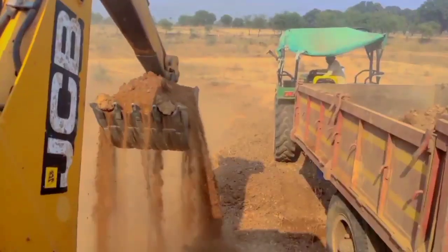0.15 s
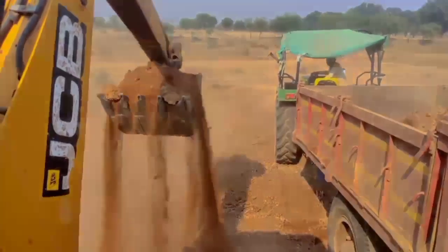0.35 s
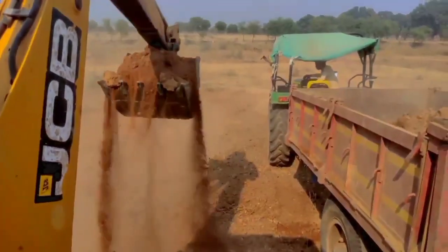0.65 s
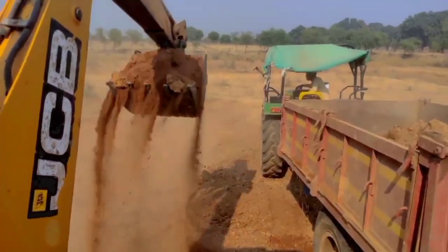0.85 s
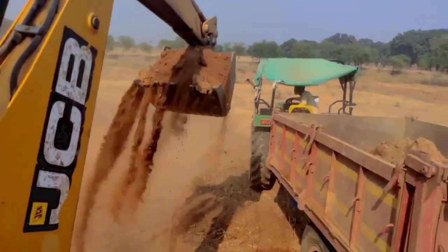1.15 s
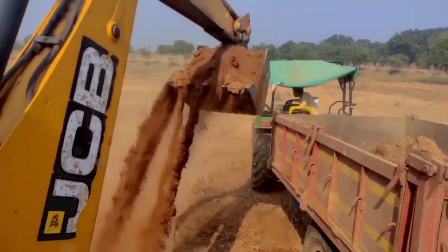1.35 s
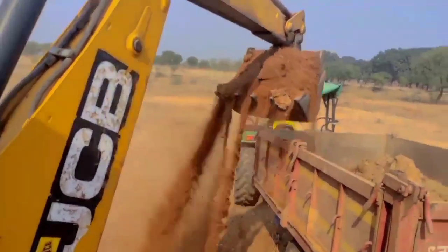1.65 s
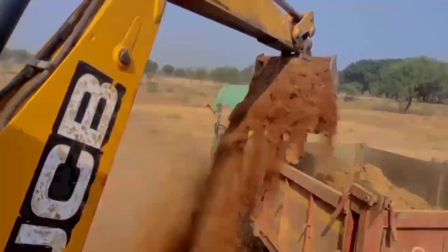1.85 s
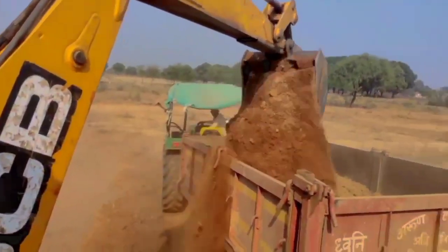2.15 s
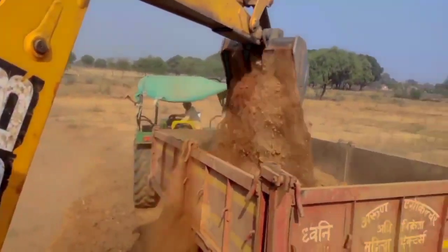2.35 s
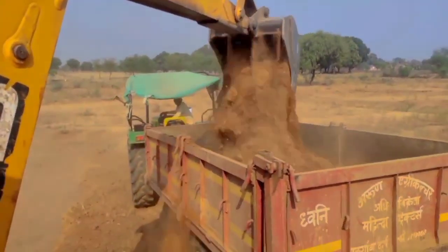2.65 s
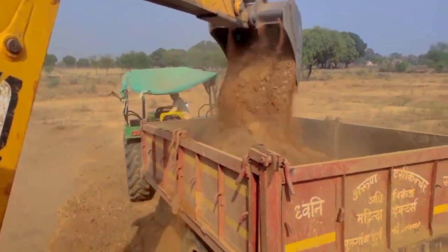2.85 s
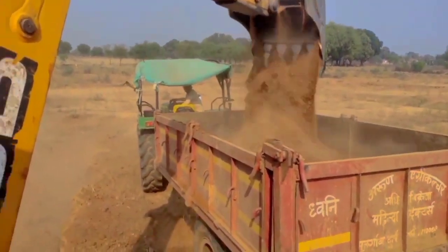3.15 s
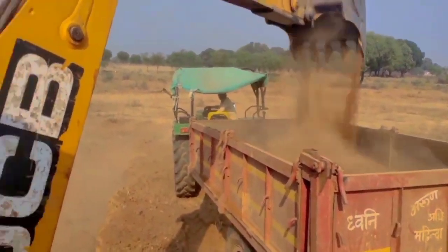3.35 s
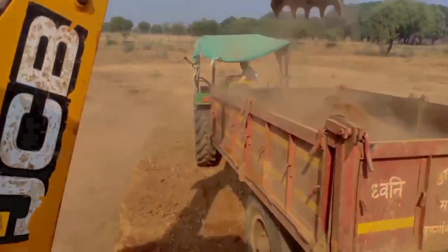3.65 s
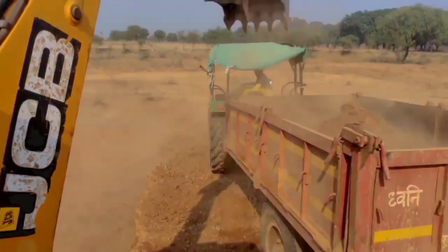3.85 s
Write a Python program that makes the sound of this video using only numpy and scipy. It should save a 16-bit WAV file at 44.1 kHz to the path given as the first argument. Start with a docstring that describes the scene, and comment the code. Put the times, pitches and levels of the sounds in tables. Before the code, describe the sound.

Soil and clods drum and thud into a steel trailer in an open field, heard from a backhoe's cab. The diesel clatters throughout; arm joints knock first, then dry pivots groan and squeal as the earth pours and hisses.

```python
"""An open field, from the cab of a backhoe that swings a bucket of soil over a steel trailer and tips it.
The dry bucket pivots stick and slip, groaning and squealing in rising steps; loose arm joints knock.
Clods drum and thud into the trailer, soil scrapes the bucket plate, fine earth hisses and grit ticks.
Underneath, the diesel's firings drive an exhaust hum, a panel rumble and a steady clatter."""
import sys
import numpy as np
from scipy import signal
from scipy.fft import rfft, irfft
from scipy.io import wavfile
from scipy.ndimage import uniform_filter1d

SR = 44100
rng = np.random.default_rng(int(sys.argv[2]) if len(sys.argv) > 2 else 0)


def wav_record(signal):
    """Record a signal, one row per channel, as 16-bit PCM in the file named by sys.argv[1]."""
    frames = np.transpose(np.atleast_2d(signal))
    bounded = np.clip(frames, -1, 1)
    # unit amplitude maps onto the largest positive 16-bit level
    quanta = np.round(bounded * 32767).astype(np.int16)
    wavfile.write(sys.argv[1], SR, quanta)


N = 176400
T = np.arange(N) / SR
HARD_ATTACK_S, SOFT_ATTACK_S = 0.0018, 0.012
CLODS_PER_S, CLOD_SPREAD_DB = 1800, 1


def from_db(db):
    """Decibels to gain."""
    return 10 ** (np.asarray(db) / 20)


def rms_one(x):
    """Scale to an rms of one."""
    return x / np.sqrt(np.mean(x ** 2) + 1e-20)


def automation(points):
    """Straight lines through (time_s, value) points, at every sample."""
    return np.interp(T, *np.transpose(points))


def drift(rate_hz):
    """Smooth random modulation, rms one, rolling off above rate_hz."""
    hop, settle = 40, 2000
    pole = np.exp(-2 * np.pi * rate_hz * hop / SR)
    noise = rng.standard_normal(N // hop + settle + 2)
    slow = signal.lfilter([1], [1, -2 * pole, pole * pole], noise)[settle:]
    return np.interp(np.arange(N) / hop, np.arange(len(slow)), rms_one(slow))


def body(x, spectrum, size=4096):
    """Colour x with a unit-energy body response drawn as (freq_hz, level_db) points."""
    hz, db = np.transpose(spectrum)
    grid_hz = np.maximum(np.arange(size // 2 + 1) * SR / size, 1)
    gain = from_db(np.interp(np.log(grid_hz), np.log(hz), db))
    cepstrum = irfft(np.log(gain))
    cepstrum[1:size // 2] *= 2   # minimum phase keeps attacks sharp
    cepstrum[size // 2 + 1:] = 0
    response = irfft(np.exp(rfft(cepstrum)))
    return signal.fftconvolve(x, response / np.linalg.norm(response))[:N]


def resonate(x, peaks, size=4096):
    """Ring x through parallel (centre_hz, width_hz, level_db) resonances, unit energy in all."""
    response = 0
    for k, (hz, width, db) in enumerate(peaks):
        band = signal.butter(2, [hz - width / 2, hz + width / 2], "band", fs=SR, output="sos")
        response = response + (-1) ** k * from_db(db) * signal.sosfilt(band, signal.unit_impulse(size))
    return signal.fftconvolve(x, response / np.linalg.norm(response))[:N]


def ring(x, centre_hz, width_hz):
    """Ring x through one resonance."""
    return resonate(x, [(centre_hz, width_hz, 0)])


def grains(per_s, spread_db):
    """Random contacts of uneven size, rms one."""
    sizes = from_db(spread_db * np.minimum(rng.exponential(1, N), 4)) * rng.choice([-1, 1], N)
    return rms_one(sizes * (rng.random(N) < per_s / SR))


def hit(start_s, attack_s, decay_s):
    """Envelope with a linear attack and an exponential tail."""
    age = np.maximum(T - start_s, 0)
    tail = np.exp(-np.minimum(np.maximum(age - attack_s, 0) / decay_s, 50))
    return np.minimum(age / attack_s, 1) * tail


def pivot_groans():
    """A dry pin sticks and slips, locking on to one pitch after another."""
    # stick-slip notes: start_s, end_s, from_hz, to_hz, level_db, overtones_db, roughness (0-1)
    groans = [(1.874, 2.02, 232.3, 300, -18.5, -29, 0.22), (2.011, 2.089, 429, 449, -25, -38, 0.31),
              (2.071, 2.22, 464, 468, -17.5, -13.5, 0.24), (2.15, 2.283, 1040, 1031, -24.5, -8, 0.22),
              (2.565, 2.783, 167.4, 248.4, -22.5, -21, 0.56), (2.974, 3.095, 724, 730, -20, -15, 0.2),
              (3.082, 3.218, 1124, 1040, -21.5, -7, 0.4), (3.084, 3.302, 994, 880, -31.5, 9, 0.57),
              (3.151, 3.304, 876, 882, -17.5, -8, 0.29)]
    attack_s, fall_curve, third_vs_second_db = 0.028, 1.52, -13.5
    jitter, shimmer_db = 0.04, 9   # pitch and level flutter at full roughness
    out, wobble, shimmer = np.zeros(N), drift(59), drift(46)
    for start, end, from_hz, to_hz, db, overtones_db, roughness in groans:
        on = (T > start) & (T < end)
        t, crest = T[on], start + attack_s
        shift = rng.integers(N)   # each note flutters its own way
        glide_hz = np.interp(t, [start, end], [from_hz, to_hz])
        pitch_hz = glide_hz * (1 + jitter * roughness * np.roll(wobble, shift)[on])
        phase = 2 * np.pi * np.cumsum(pitch_hz) / SR
        overtones = np.sin(2 * phase) + from_db(third_vs_second_db) * np.sin(3 * phase)
        tone = np.sin(phase) + from_db(overtones_db) * overtones
        swell = np.interp(t, [start, crest], [0, 1]) * np.interp(t, [crest, end], [1, 0]) ** fall_curve
        gain = from_db(db + shimmer_db * roughness * np.roll(shimmer, shift)[on])
        out[on] += np.sqrt(2) * swell * tone * gain
    return out


def arm_knocks():
    """Loose steel joints chatter briefly after each blow and ring in three registers."""
    # blows in the arm and bucket: start_s, clank_db, rattle_db, chink_db, decay_s
    knocks = [(.574, -18.5, -29, -31, 0.046), (0.662, -12, -51, -55, 0.0089),
              (1.395, -14.5, -26, -28.5, 0.041), (1.596, -20, -41, -39, 0.026),
              (1.792, -30, -36, -30.5, 0.027), (1.933, -13.5, -50, -53, 0.016),
              (2.144, -17.5, -17.5, -20.5, 0.036), (2.299, -22.5, -62, -58, 0.054),
              (2.483, -16.5, -42, -36.5, 0.043), (2.944, -23, -33, -36, 0.053),
              (3.254, -18, -31.5, -60, 0.055), (3.364, -16.5, -27.5, -28, 0.021),
              (3.455, -14, -21, -27.5, 0.013), (3.499, -15, -23, -28.5, 0.023),
              (3.6337, -13, -37, -56, 0.014)]
    # low, middle and high resonances of the bucket steel: centre_hz, width_hz, level_db
    clank = [(1051, 204, 1), (1438, 354, 6.5), (1777, 227, 13), (2117, 620, -1.5)]
    rattle = [(3460, 840, 5), (4148, 43, 14.5), (4356, 360, 7.5), (4930, 2750, -1.5)]
    chink = [(7960, 980, -2.5), (9430, 830, -2.5), (11800, 1500, -12)]
    out = 0
    for k, register in enumerate((clank, rattle, chink)):
        power = sum((from_db(levels_db[k]) * hit(start, HARD_ATTACK_S, decay)) ** 2
                    for start, *levels_db, decay in knocks)
        chatter = resonate(grains(per_s=2500, spread_db=0), register)
        running_rms = np.sqrt(np.abs(uniform_filter1d(chatter ** 2, size=500)) + 1e-9)
        out = out + np.sqrt(power) * chatter / running_rms
    return out


def steel_rings():
    """Heavy blows boom in the large panels, light ones ping on a pin or tooth, each a rough ring."""
    # heavy blows: start_s, level_db
    booms = [(.666, -24), (2.296, -33)]
    # panel modes: pitch_hz, level_db, t60_s
    panel_modes = [(400, -3.5, 0.19), (892, 4, .2), (1020, 11.5, 0.023)]
    # small steel parts: start_s, pitch_hz, level_db
    pings = [(0.986, 4440, -35), (0.987, 2000, -24), (1.597, 3430, -23.5), (1.595, 2046, -16),
             (2.32, 4400, -32.5), (2.569, 4450, -23)]
    ping_decay_s = 0.016
    notes = [(start, hz, db + mode_db, SOFT_ATTACK_S, t60 / np.log(1000))
             for start, db in booms for hz, mode_db, t60 in panel_modes]
    notes += [(start, hz, db, HARD_ATTACK_S, ping_decay_s) for start, hz, db in pings]
    return sum(from_db(db) * hit(start, attack, decay) * ring(rng.standard_normal(N), hz, 0.13 * hz)
               for start, hz, db, attack, decay in notes) / np.sqrt(2)


def clods():
    """Soil drums on the trailer in clumps; the heavy clods thud."""
    # swell of the pour and of its thuds: time_s, level_db
    pour_levels = [(1.7, -50), (1.85, -36), (2.1, -35), (2.2, -22.5), (2.36, -26.5), (2.42, -35.5),
                   (2.55, -24), (2.66, -28), (2.76, -21.5), (3.0, -24), (3.55, -36), (3.75, -39)]
    thud_levels = [(2.24, -49), (2.3, -25.5), (2.45, -39.5), (2.7, -31.5), (3.1, -32), (3.22, -65)]
    # tone of the trailer floor: freq_hz, level_db
    trailer_eq = [(150, -52), (420, -9), (620, -22), (880, 2.5), (1750, 9), (2750, -9.5), (4000, -14.5),
                  (7000, -49)]
    impacts = grains(CLODS_PER_S, CLOD_SPREAD_DB) * from_db(automation(pour_levels) + 3 * drift(27.5))
    thuds = ring(grains(per_s=170, spread_db=1), centre_hz=181.7, width_hz=42.5)
    return body(impacts, trailer_eq) + thuds * from_db(automation(thud_levels))


def big_lumps():
    """Each big lump lands softly and sets one wavering note of the trailer going."""
    # landings: start_s, pitch_hz, level_db
    lumps = [(2.239, 581, -25.5), (2.272, 190, -22.5), (2.498, 470, -27.5), (2.785, 205, -20.5)]
    return sum(from_db(db) * hit(start, SOFT_ATTACK_S, decay_s=0.026)
               * np.sin(2 * np.pi * hz * T + drift(39)) for start, hz, db in lumps)


def soil_scrapes():
    """Sliding soil rubs the bucket plate into a rough, narrow ring."""
    # slides over the plate: start_s, end_s, pitch_hz, level_db
    scrapes = [(2.733, 3.006, 837, -30.5), (2.814, 3.12, 684, -33.5), (3.22, 3.537, 823, -30)]
    fade_s = 0.034
    out = 0
    for start, end, hz, db in scrapes:
        stroke = np.clip(np.minimum(T - start, end - T) / fade_s, 0, 1)
        out = out + from_db(db) * stroke * ring(grains(CLODS_PER_S, CLOD_SPREAD_DB), hz, width_hz=78)
    return out


def fine_earth():
    """Fine earth hisses with coarser grains in it; single bits of grit tick close by."""
    # earth sliding off the bucket: time_s, level_db
    trickle_levels = [(.2, -44.5), (1.2, -48), (2.15, -33.5), (2.45, -40), (2.98, -41), (3.18, -44.5),
                      (3.31, -38.5), (3.55, -36.5), (3.68, -51)]
    # tone of its hiss: freq_hz, level_db
    hiss_eq = [(2800, -32), (3700, 0.5), (6500, -15), (8000, 2.5), (11900, 3), (13500, -3.5)]
    # grit strikes: start_s, level_db
    grit = [(.779, -26.5), (1.164, -27), (1.541, -30), (1.579, -26), (2.014, -14), (2.101, -17),
            (2.233, -26), (2.346, -23), (2.657, -24), (2.719, -20)]
    fine = grains(per_s=7000, spread_db=4)
    coarse = from_db(-9.5) * grains(per_s=45, spread_db=1.1)
    flow = from_db(automation(trickle_levels) + 3.4 * drift(34))
    hiss = body((fine + coarse) * flow, hiss_eq)
    tick_envelope = sum(from_db(db) * hit(start, attack_s=0.0013, decay_s=0.0024) for start, db in grit)
    tick_band = signal.butter(2, [8860, 13200], "band", fs=SR, output="sos")
    return hiss + tick_envelope * rms_one(signal.sosfilt(tick_band, rng.standard_normal(N)))


def diesel():
    """Each firing drives the exhaust hum, shakes the panels and sets off a burst of clatter."""
    # engine firing: time_s, rate_hz
    firing_rates = [(0.22, 49.48), (3.34, 50), (4.0, 46.96)]
    # swell of the exhaust hum: time_s, level_db
    hum_levels = [(.22, -39), (1.0, -35), (2.06, -41), (2.19, -69), (2.28, -37.5), (3.1, -39),
                  (3.22, -49.5), (3.32, -39.5), (3.58, -43.5), (3.68, -55), (3.745, -34), (3.87, -28.5)]
    # exhaust harmonics: multiple of the firing rate, level_db
    harmonics = [(1, -16.5), (2, -3), (3, 1), (4, -5.5)]
    # tone of the shaken panels and of the clatter: freq_hz, level_db
    rumble_eq = [(70, -21.5), (140, -4.5), (195, -0.5), (270, -8), (350, -19), (570, -20), (700, -29.5),
                 (1500, -71)]
    clatter_eq = [(820, -24.5), (1150, -2), (1700, 3.5), (2250, -8.5), (2600, -35.5), (2950, -38.5),
                  (3350, -9), (4300, -21.5), (5000, -28), (6600, -31.5), (8700, -17.5), (11000, -31.5)]
    # a loose panel buzzing on and off: start_s, level_db
    buzzes = [(0.364, -39.5), (0.918, -36), (1.64, -37.5), (1.8, -37)]
    burst_decay_s, waver_db, throb_db, clatter_db = 0.016, 3, 3.5, -31.5
    firing_hz, hum_db = automation(firing_rates), automation(hum_levels)
    cycles = np.cumsum(firing_hz) / SR
    hum = sum(from_db(db + waver_db * drift(5.9)) * np.sin(2 * np.pi * (k * cycles + rng.random()))
              for k, db in harmonics)
    since_firing_s = (cycles % 1) / firing_hz
    bursts = rms_one(1 + np.exp(-since_firing_s / burst_decay_s))
    rumble_db = np.minimum(hum_db + 1.5, -39)   # rides the hum up to a ceiling
    rumble = body(bursts * rng.standard_normal(N), rumble_eq)
    rumble *= from_db(rumble_db + throb_db * drift(19.5))
    clatter = body(bursts * rng.standard_normal(N), clatter_eq) * from_db(clatter_db + drift(19))
    buzz = ring(bursts * rng.standard_normal(N), centre_hz=981, width_hz=57)
    buzz *= sum(from_db(db) * hit(start, attack_s=0.052, decay_s=0.14) for start, db in buzzes)
    return np.sqrt(2) * hum * from_db(hum_db) + rumble + clatter + buzz


def echoes(x):
    """The machine and the trailer throw back short, dull reflections."""
    # reflections: delay_s, level_db
    taps = [(.0075, -14), (.019, -11)]
    dull = signal.sosfilt(signal.butter(1, 2100, fs=SR, output="sos"), x)
    return sum(from_db(db) * np.interp(T - delay, T, dull, left=0) for delay, db in taps)


def scene():
    """Mono mix of engine, arm and soil; only the knocks, rings and clods echo."""
    impacts = arm_knocks() + steel_rings() + clods()
    mix = diesel() + pivot_groans() + soil_scrapes() + big_lumps() + fine_earth() + impacts
    return (mix + echoes(impacts))[None]


def record(dry):
    """A moment of silence, a quick fade-in and a steep cut of the top treble."""
    start_s, fade_in_s, cutoff_hz = 0.2, 0.026, 15700
    faded = dry * np.clip((T - start_s) / fade_in_s, 0, 1)
    return signal.sosfilt(signal.ellip(10, .2, 80, cutoff_hz, fs=SR, output="sos"), faded)


dry = scene()
out = record(dry)
wav_record(out)
```